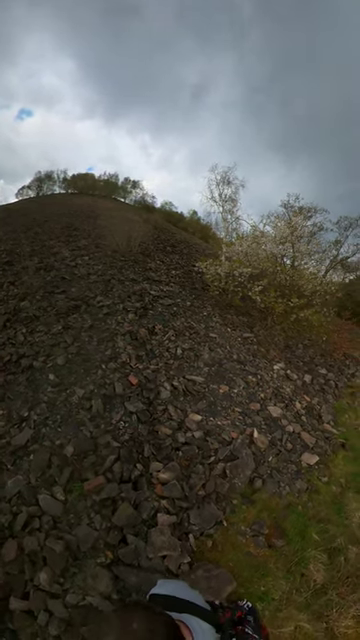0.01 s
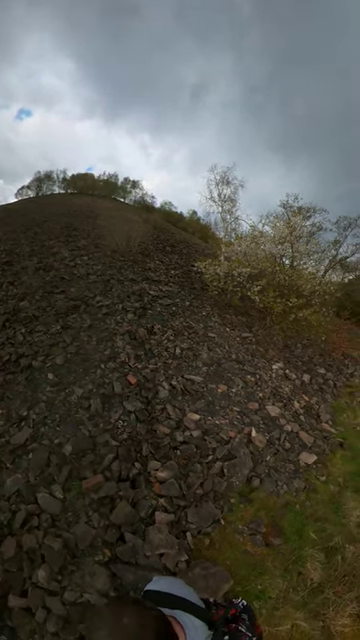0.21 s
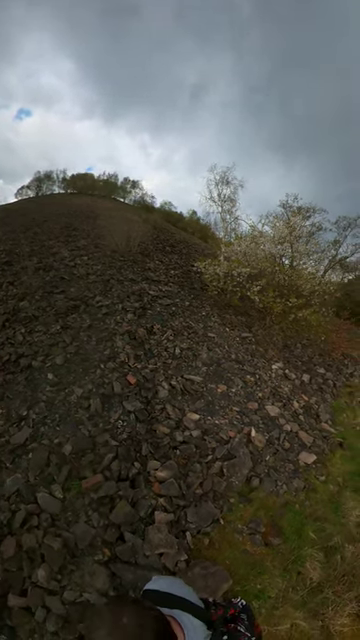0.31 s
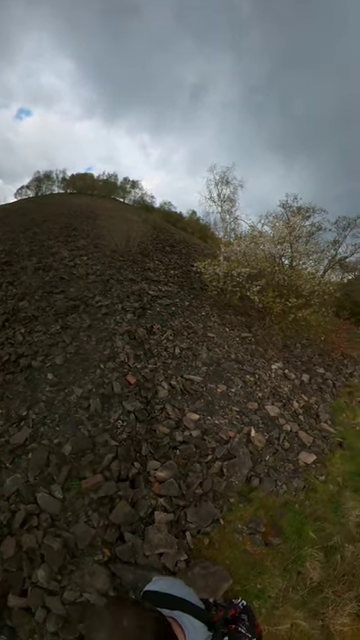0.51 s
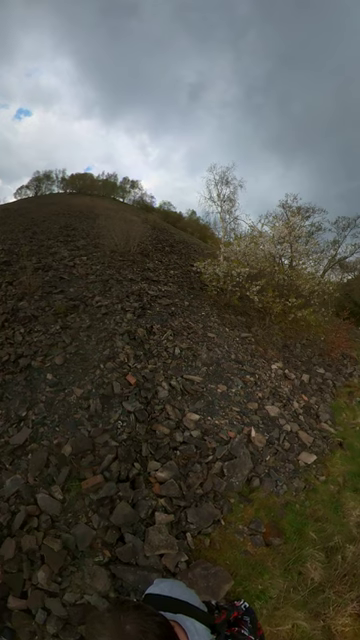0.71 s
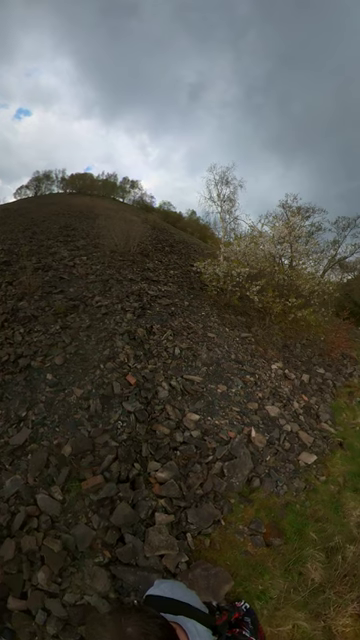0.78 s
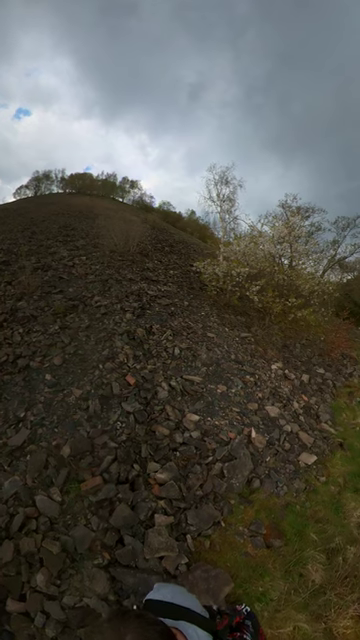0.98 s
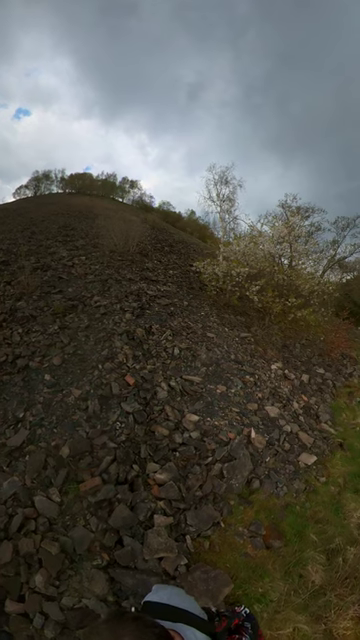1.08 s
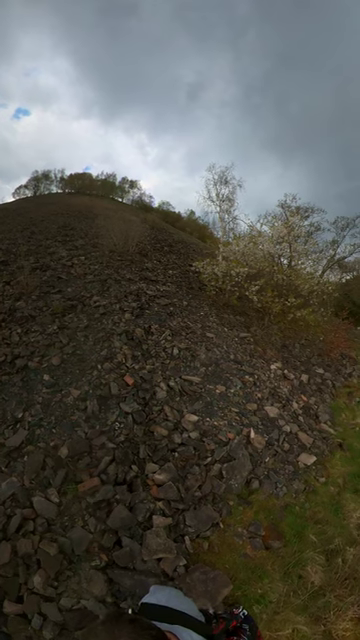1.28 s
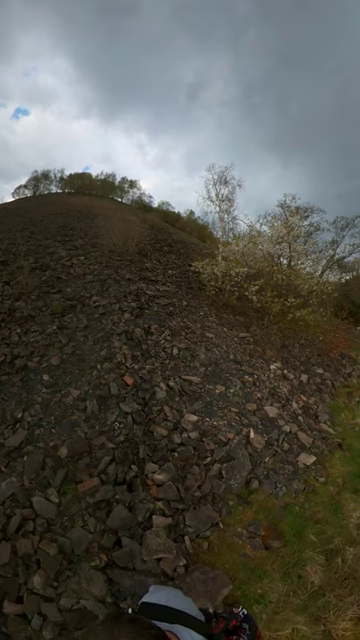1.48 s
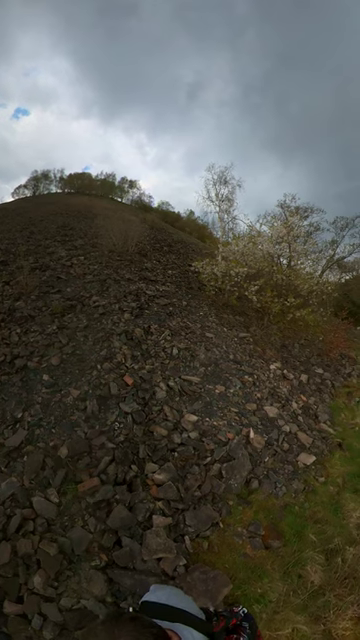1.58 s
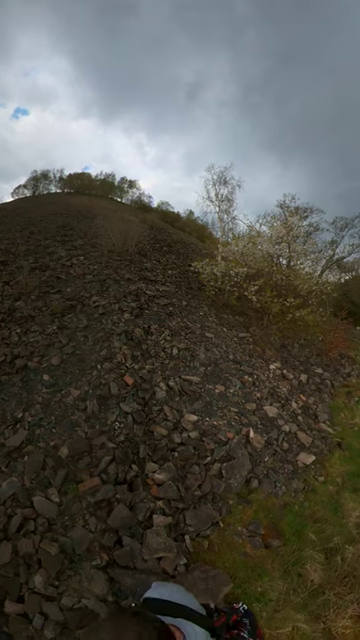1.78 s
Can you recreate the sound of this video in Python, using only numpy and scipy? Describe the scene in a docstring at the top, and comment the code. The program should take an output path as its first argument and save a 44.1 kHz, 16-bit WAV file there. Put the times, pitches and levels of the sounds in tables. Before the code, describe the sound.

A hammer hits stone three times in quick, even succession, each blow a sharp crack with a brief steel ring. Loose chips knock onto rubble afterwards, while faint birds chirp and wind rumbles on the microphone outdoors.

```python
"""On an open scree slope a hammer blow dies away as wind buffets the microphone.
Loose chips land with dull knocks, and small birds begin to call far off.
Three more blows fall on the stone at an even pace: each cracks, rings in stone and steel,
thuds through the ground and scatters off the rubble.
Then the hammer rests; the last chips land, the birds stop and the wind gusts on."""
import sys
import numpy as np
from scipy import signal
from scipy.fft import rfft, irfft, next_fast_len
from scipy.io import wavfile
from scipy.ndimage import uniform_filter1d

SR = 44100
rng = np.random.default_rng(int(sys.argv[2]) if len(sys.argv) > 2 else 0)


def dump_mix(stems):
    """Bounce the given channels to the path in sys.argv[1] as a 16-bit WAV at rate SR."""
    frames = np.atleast_2d(stems).T  # one column per channel
    limited = np.clip(frames, -1, 1)  # hard clip at full scale
    pcm = np.round(limited * 32767).astype(np.int16)
    wavfile.write(sys.argv[1], SR, pcm)


N = 79380


def amp(db):
    """Amplitude ratio of a level in decibels."""
    return 10 ** (np.asarray(db) / 20)


def unit(x):
    """Normalisation to rms 1."""
    return x / np.sqrt(np.mean(x ** 2) + 1e-20)


def read(points, hz):
    """Interpolation on a log-frequency axis."""
    f, value = np.transpose(points)
    return np.interp(np.log(hz + 1), np.log(f + 1), value)


def add(mix, s, sound):
    """Superposition of a sound starting at s seconds."""
    at = round(s * SR)
    sound = sound[max(-at, 0):]
    part = mix[max(at, 0):][:len(sound)]
    part += sound[:len(part)]


def noise(spectrum, size, colour=((1, 0), (2, 0))):
    """Random-phase noise of a given spectrum, scaled to rms 1, then filtered by a colour."""
    hz = np.fft.rfftfreq(size, 1 / SR)
    z = amp(read(spectrum, hz)) * np.exp(2j * np.pi * rng.random(len(hz)))
    return irfft(z * amp(read(colour, hz)), size) / irfft(z, size).std()


def ring(modes, t, colour):
    """Free vibration: damped modes of alternating sign, weighted by a colour."""
    return sum((-1) ** k * amp(db + read(colour, hz) - 60 * t / t60) * np.sin(2 * np.pi * hz * t)
               for k, (hz, db, t60) in enumerate(modes))


# Blows: t/s, strength/dB, gain/dB in each of five colour bands, gain/dB of each of three steel modes
BLOWS = [(-0.04, -3, 7.5, 8.5, -1, 0.5, -5.5, -18, -7.5, -18),
         (0.2311, -1, 4.5, -2, 1.5, -1, -2.5, -6.5, -10, -5),
         (0.5065, -2, 1, 4.5, 0, 2, -2.5, -19, 6, -13.5),
         (0.7863, 0.5, -7, 3.5, 3.5, -7.5, -16, -2, -2.5, -24)]
# Colour bands (knock, middle, clink, treble, top): f/Hz
COLOUR_HZ = [1100, 2500, 4300, 6500, 8000]
# Contact noise spectrum: f/Hz, level/dB
CRACK_SPECTRUM = [(100, -18.5), (480, -12.5), (630, 0.5), (790, -11), (1150, 0), (1850, -6.5),
                  (2350, -12.5), (3300, -9.5), (4450, -2.5), (5000, -5.5), (6500, 6), (8000, -3),
                  (9200, -10), (14000, -26)]
# Modes of the struck stone: f/Hz, level/dB, T60/s
STONE_MODES = [(635, -25, .03), (900, -28, .018), (1050, -28, .018), (1180, -21, .025), (1480, -36, .02),
               (1760, -33, .025), (2900, -40, .03), (4000, -33, .025), (4312, -25, .042), (5690, -34, .025),
               (6500, -27, .04), (6790, -28, .048), (7260, -34, .035), (7850, -31, .028)]

def hammer():
    """Impact excitation: contact gives a bright snap and a gritty crack; stone and steel ring."""
    snap_db, snap_t60_s = -17.5, .013
    grit_db, grit_t60_s = -27, .048
    attack_s, stone_rise_s, scatter_db = .0007, .00075, -21
    out, t = np.zeros(N), np.arange(SR * 3 // 4) / SR
    for s, db, knock, middle, clink, treble, top, *ring_db in BLOWS:
        colour = list(zip(COLOUR_HZ, (knock, middle, clink, treble, top)))
        brighter = colour + [(8800, top + 3.5)]
        snap = amp(snap_db - 60 * t / snap_t60_s) * noise(CRACK_SPECTRUM, len(t), brighter)
        grit = amp(grit_db - 60 * t / grit_t60_s) * noise(CRACK_SPECTRUM, len(t), colour)
        crack = np.minimum(t / attack_s, 1) * (snap + grit)
        stone = (1 - np.exp(-(t / stone_rise_s) ** 2)) * ring(STONE_MODES, t, colour)
        hit = crack + stone
        add(out, s, amp(db) * (hit + steel(t, ring_db) + amp(scatter_db) * scatter(crack)))
        add(out, s - .0198, amp(db - 28.5) * hit)  # a faint tick just ahead of the blow
    return out


# Mode clusters of the steel head: f/Hz, spread/Hz, level/dB, T60/s
STEEL_MODES = [(4355, 80, -59, .48), (6510, 190, -57, .29), (6815, 18, -58, .46)]

def steel(t, ring_db):
    """Beating: close modes of the head shimmer; where it lands decides which clusters are strong."""
    out = np.zeros(len(t))
    for (hz, spread_hz, db, t60), extra_db in zip(STEEL_MODES, ring_db):
        offsets, phases = rng.random(size=(2, 6, 1))
        partials_hz = hz + spread_hz * (2 * offsets - 1)
        cluster = np.sin(2 * np.pi * (partials_hz * t + phases)).sum(0)
        out += amp(db + extra_db - 60 * t / t60) * unit(cluster) / np.sqrt(2)
    return out


# Decay of the rubble's echoes: f/Hz, T60/s
RUBBLE_DECAY = [(200, .25), (700, .24), (2500, .2), (4300, .21), (6600, .23), (9000, .22)]
# Their initial spectrum: f/Hz, level/dB
RUBBLE_SPECTRUM = [(300, 5.5), (1200, 1), (2800, -2), (4300, 1), (5300, -5), (6700, -2.5), (8500, -0.5)]

def scatter(x):
    """Diffuse reflection: the rubble returns many echoes, each band decaying at its own rate."""
    uneven_db, facet_s, delay_s = 7.5, .003, .004
    size = SR // 2
    rocks = np.clip(rng.standard_normal(1000), -2, 2)  # single rocks reflect more or less strongly
    facets = np.interp(np.arange(size) / SR / facet_s, np.arange(1000), rocks)
    echoes = rng.standard_normal(size) * amp(uneven_db * facets)
    hz, t, bands = signal.stft(echoes, SR, nperseg=256)
    decay = amp(read(RUBBLE_SPECTRUM, hz)[:, None] - 60 * t / read(RUBBLE_DECAY, hz)[:, None])
    tail = signal.istft(bands * decay, SR, nperseg=256)[1]
    tail *= np.clip(np.arange(len(tail)) / SR / delay_s - 1, 0, 1)  # fades in after the delay
    return signal.fftconvolve(x, tail / np.linalg.norm(tail))[:len(x)]


# Gusts: t/s, level/dB
GUSTS = [(0, -47), (0.079, -89), (0.103, -53.5), (.155, -43.5), (0.222, -51.5), (.29, -54), (0.352, -47),
         (.4, -64.5), (0.467, -48), (.5, -60), (.58, -51.5), (0.682, -43), (0.712, -63.5), (.742, -35.5),
         (.775, -53), (0.813, -35.5), (.86, -49.5), (1.0, -52), (1.102, -62.5), (1.136, -34), (1.17, -54),
         (1.227, -33), (1.279, -48.5), (1.37, -67.5), (1.453, -38), (1.488, -57), (1.525, -42.5),
         (1.629, -67.5), (1.8, -64.5)]
# Eddy spectrum: f/Hz, level/dB
EDDY_SPECTRUM = [(10, -23.5), (28, 7), (50, 4), (90, 0), (130, -11), (180, -27.5), (260, -39.5),
                 (500, -57.5), (2000, -100)]
# Background hiss spectrum: f/Hz, level/dB
HISS_SPECTRUM = [(30, 4), (150, 3.5), (300, -3), (600, -6), (1200, -16.5), (2500, -20.5), (6500, -20.5),
                 (8000, -30.5), (9000, -30.5), (11000, -16)]

def wind():
    """Turbulence: low eddies at the microphone follow the gusts, over a steady faint background hiss."""
    eddies = noise(EDDY_SPECTRUM, N)
    power = uniform_filter1d(uniform_filter1d(eddies ** 2, size=900), size=900)
    eddies /= np.sqrt(power + 0.09)  # evened out, so the gusts set the level
    gusts = amp(np.interp(np.arange(N) / SR, *np.transpose(GUSTS)))
    return gusts * eddies + amp(-72) * noise(HISS_SPECTRUM, N)


# Landings: t/s, level/dB, brightness/dB, pitch ratio
LANDINGS = [(0.014, -43.5, -6, 1.017), (0.3055, -44, -9.5, 0.96), (0.564, -51.5, -14, .97),
            (0.828, -50, 6.5, 0.97), (0.987, -44, -3.5, 0.975), (1.061, -48, 7, 1.1),
            (1.0725, -40, -10.5, 1), (1.088, -60, 8, .87), (1.128, -45, -14.5, 1.06)]
# Modes of a chip: f/Hz, level/dB, T60/s (at pitch ratio 1)
CHIP_MODES = [(380, -13.5, 0.034), (625, 2, 0.028), (853.2, 4, 0.0083), (1305, -2.5, 0.021),
              (1340, -13, .026), (1860, -17, 0.032)]
# Landing noise spectrum: f/Hz, level/dB
CHIP_SPECTRUM = [(200, -11.5), (400, -7.5), (600, -3), (1400, -6), (1950, -10), (2500, -35), (4500, -27),
                 (8000, -51)]

def chips():
    """Modal scaling: loose chips knock on the rubble, the smaller ringing higher and shorter."""
    rise_s, grit_db, grit_t60_s, scatter_db = .0027, -7.5, .04, -14.5
    out, t = np.zeros(N), np.arange(SR // 5) / SR
    for s, db, bright_db, pitch in LANDINGS:
        colour = [(700, 0.0047), (1600, bright_db)]
        grit = amp(grit_db - 60 * t / grit_t60_s) * noise(CHIP_SPECTRUM, len(t), colour)
        knock = ring(CHIP_MODES, t * pitch, colour)
        add(out, s, amp(db) * np.minimum(t / rise_s, 1) * (grit + knock))
    return out + amp(scatter_db) * scatter(out)


# Bird notes: t/s, duration/s, start f/Hz, end f/Hz, level/dB, relative rms frequency deviation
BIRD_NOTES = [(0.105, 0.076, 3040, 3602, -79.5, .015), (0.148, 0.04, 3810, 4000, -71.5, 0.021),
              (0.791, .026, 2060, 1986, -46, .015), (0.877, 0.017, 1985, 2090, -60.5, .015),
              (0.856, 0.044, 5420, 5540, -70.5, 0.036), (0.912, .045, 2980, 3060, -79, 0.0096),
              (0.953, .03, 3006, 3144, -64.5, 0.0069), (0.98, 0.032, 3250, 3495, -65, 0.072),
              (0.992, 0.071, 3610, 3320, -72, 0.072), (1.206, 0.075, 4280, 4400, -83, .014)]

def birds():
    """Frequency modulation: distant whistles and pips glide and waver, rasping if the waver is deep."""
    out = np.zeros(N)
    for s, length, start_hz, end_hz, db, deviation in BIRD_NOTES:
        t = np.arange(0, length, 1 / SR)
        waver = unit(uniform_filter1d(rng.standard_normal(SR // 4), size=70))[:len(t)]
        glide_hz = start_hz + (end_hz - start_hz) * t / length
        phase = 2 * np.pi * np.cumsum(glide_hz * (1 + deviation * waver)) / SR
        add(out, s, amp(db) * np.sin(np.pi * t / length) * np.sin(phase))
    return out + amp(-18) * scatter(out)


# Ground thuds: t/s, level/dB, f/Hz
THUDS = [(0.2345, -30, 145.5), (0.512, -31, 142.3), (0.8, -30.5, 104)]

def ground():
    """Damped oscillation: the struck stone rocks on its bed for a few low cycles."""
    rise_s = .0047
    out, t = np.zeros(N), np.arange(SR // 8) / SR
    envelope = (t / rise_s * np.exp(1 - t / rise_s)) ** 2
    for s, db, hz in THUDS:
        add(out, s, amp(db) * envelope * np.sin(2 * np.pi * hz * t))
    return out


def scene():
    """Linear superposition: all sources sum at one microphone."""
    return (hammer() + wind() + chips() + birds() + ground())[None]


# Microphone response: f/Hz, level/dB
MIC_RESPONSE = [(7800, 0), (8600, -4), (9300, -13), (9900, -31.5), (12000, -29.5)]

def record(dry):
    """Low-pass filtering: the microphone's treble roll-off, then a sharp band limit."""
    size = next_fast_len(N + SR // 10)
    response = amp(read(MIC_RESPONSE, np.fft.rfftfreq(size, 1 / SR)))
    dull = irfft(rfft(dry, size) * response, size)[:, :N]
    band_limit = signal.firwin(255, cutoff=12200, window=("kaiser", 9), fs=SR)
    return signal.oaconvolve(dull, band_limit[None], "same")


dry = scene()
out = record(dry)
dump_mix(out)
```